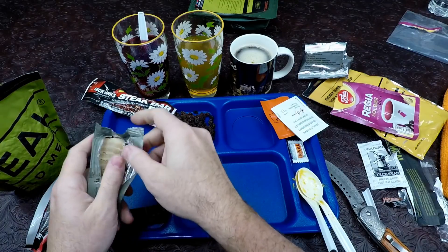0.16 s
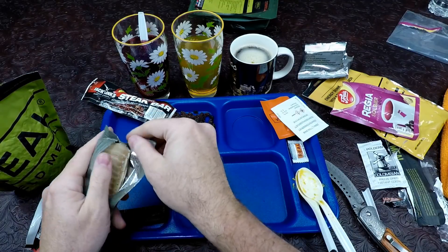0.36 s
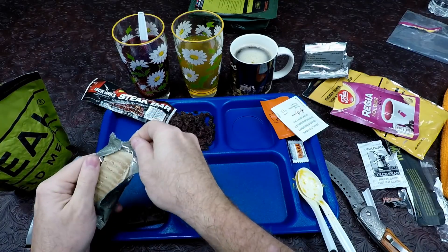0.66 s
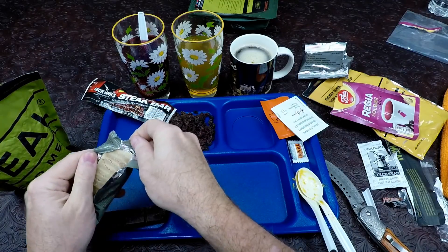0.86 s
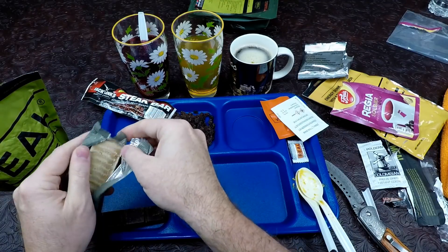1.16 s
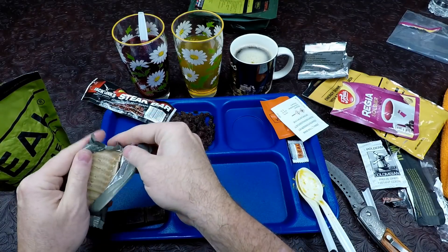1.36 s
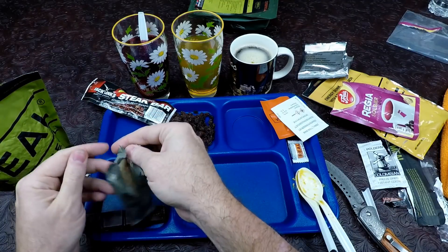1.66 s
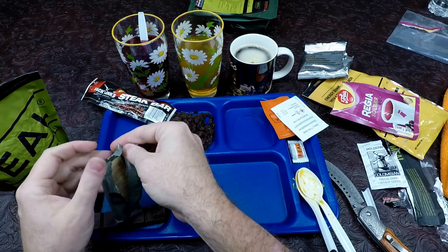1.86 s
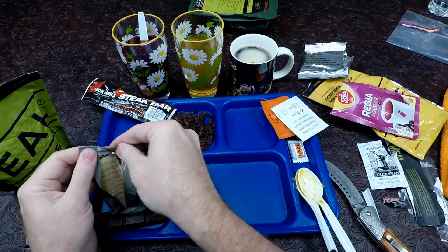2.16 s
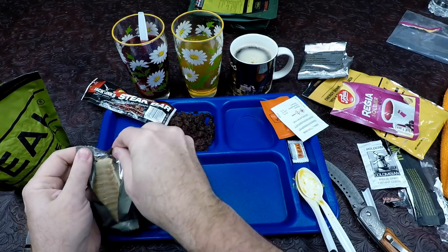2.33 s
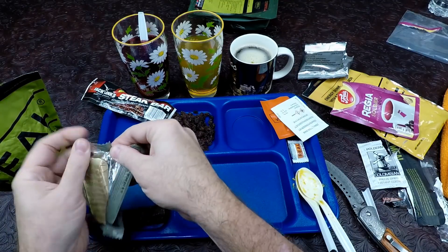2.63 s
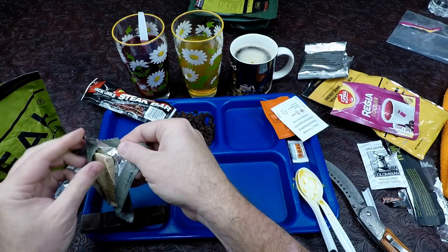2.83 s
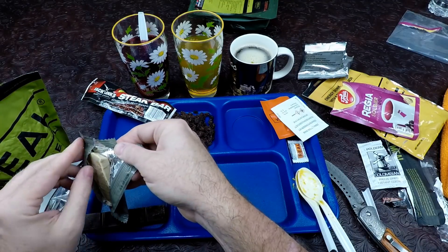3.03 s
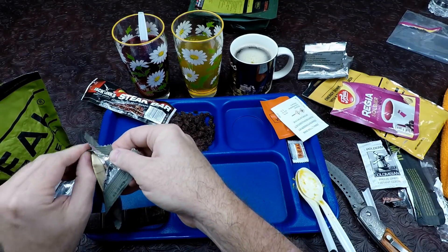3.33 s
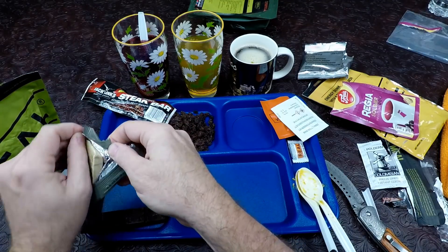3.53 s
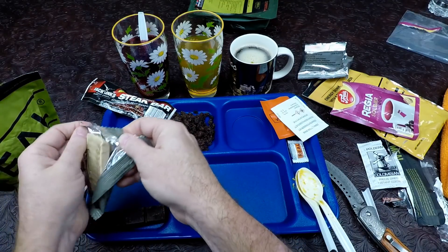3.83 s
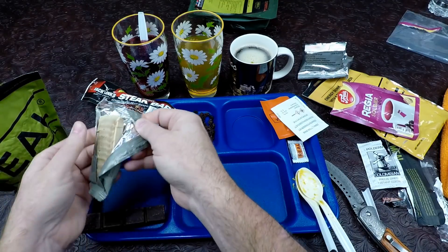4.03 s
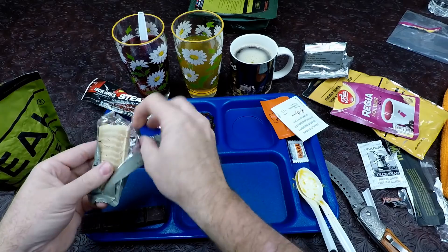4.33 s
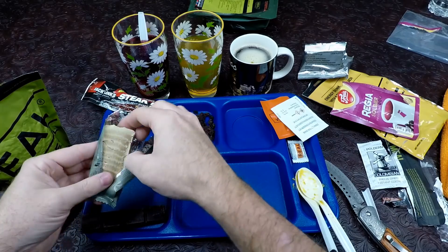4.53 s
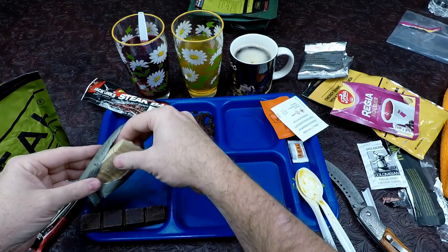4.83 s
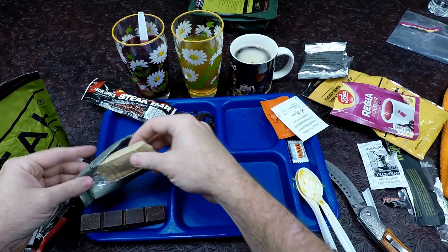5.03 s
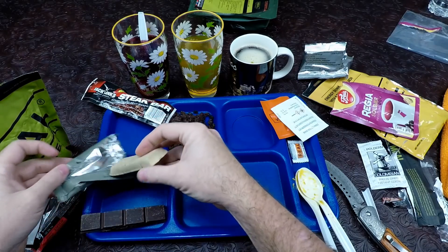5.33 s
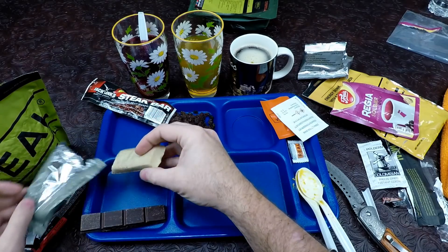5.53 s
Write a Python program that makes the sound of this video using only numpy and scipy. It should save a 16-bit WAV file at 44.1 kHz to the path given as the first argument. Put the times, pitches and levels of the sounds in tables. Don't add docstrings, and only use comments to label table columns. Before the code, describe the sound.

Close to the microphone, hands work a stiff foil-lined snack wrapper over a tray in a furnished room. From 0 to 0.95 s the seam is pulled: continuous fine crackle, bright ticks and clustered snaps, with small muffled thumps of trapped air. Around 1 s it eases, with scattered ticks, then stronger cracks arrive at 1.5-1.85 s as the foil tears. A short lull near 2.05 s leads to another sharp burst from 2.15 to 2.75 s, loudest around 2.3-2.5 s. From 2.9 to 3.45 s it is nearly still, with one soft pop near 3 s. Peeling brings crisp snaps from 3.5 to 4.15 s, then lighter settling ticks until 4.9 s. A brief crackle at 5.05-5.1 s and a fine rustle around 5.25 s accompany the snack sliding out, fading by the end. Short table reflections, a modest room tail, faint air and low appliance hum remain.

```python
import sys
import numpy as np
from scipy import signal
from scipy.fft import rfft, irfft, next_fast_len
from scipy.io import wavfile
from scipy.ndimage import uniform_filter1d

SR = 44100
rng = np.random.default_rng(int(sys.argv[2]) if len(sys.argv) > 2 else 0)


def dump(signal):
    limited = np.clip(np.atleast_2d(signal).T, -1, 1)
    pcm = np.round(limited * 32767).astype(np.int16)
    wavfile.write(sys.argv[1], SR, pcm)


def level_to_linear(level):
    exponent = np.asarray(level, float) / 20
    return 10 ** exponent


N = 250471
RING_WIDTH = 0.15


def unit(x):
    return x / np.sqrt(np.mean(x ** 2, axis=-1, keepdims=True) + 1e-20)


def along(points, hz):
    f, value = np.transpose(points)
    return np.interp(np.log(hz + 1), np.log(f + 1), value)


def coloured(x, points):
    n = x.shape[-1]
    m = 2 * next_fast_len(n)
    gain = level_to_linear(along(points, np.fft.rfftfreq(m, 1 / SR)))
    cepstrum = irfft(np.log(gain + 1e-6), m)
    cepstrum[1:m // 2] *= 2
    cepstrum[m // 2 + 1:] = 0
    return irfft(rfft(x, m) * np.exp(rfft(cepstrum)), m)[..., :n]


def resonant(x, hz, width_hz):
    m = 2 * x.shape[-1]
    f = np.fft.rfftfreq(m, 1 / SR)
    damping = 1j * f * width_hz
    return irfft(rfft(x, m) * damping / (hz * hz - f * f + damping), m)[..., :m // 2]


def placed(rows, s):
    at = np.round(s * SR).astype(int)[:, None] + np.arange(rows.shape[1])
    return np.bincount(at.ravel(), rows.ravel(), N + SR)[:N]


def bursts(count, size, t60, spread, lumpy_db, rise, jolt):
    t = np.arange(size) / SR
    life = t60 * np.exp(spread * rng.standard_normal((count, 1)))
    stutter = unit(uniform_filter1d(rng.standard_normal((count, size)), size=14))
    envelope = level_to_linear(-60 * t / life + lumpy_db * stutter) * (1 - np.exp(-(t / rise) ** 2))
    force = rng.standard_normal((count, size)) * envelope
    flip = rng.uniform(-1, 1, count)
    force[:, round(rise * SR)] += jolt * (flip + 0.14 * np.sign(flip))
    return force


def facet(force, hz, sharp, broad):
    hump = resonant(force, hz, broad * hz)
    ring = resonant(hump, hz, sharp * hz)
    return unit(unit(ring) + unit(hump))


# (frequency [Hz], level [dB per Hz])
AIR = [(15, -25), (25, -4.5), (64, -14.5), (123, -8), (363, -11.5), (451, -19), (659, -15.5), (1480, -21.5),
       (8360, -27), (14800, -36)]
# (frequency [Hz], level [dB rms], width [Hz]); the first is the wavering mains tone
HUM = [(120.2, -65.5, 1.4), (138, -76, 1.8), (171.8, -66.5, 16), (235, -69.5, 14.4), (368, -75, 3),
       (401.5, -77.5, 3)]


def background():
    f = np.fft.rfftfreq(N, 1 / SR)
    hum = 0
    for hz, db, width in HUM[1:]:
        line = rfft(rng.standard_normal(N)) / (1 + (2 * (f - hz) / width) ** 2)
        hum = hum + level_to_linear(db) * unit(irfft(line, N))
    hz, db, drift = HUM[0]
    wander = drift * np.cumsum(rng.standard_normal(N)) / SR ** 0.5
    mains = level_to_linear(db + 3.5) * np.sin(2 * np.pi * hz * np.arange(N) / SR + wander)
    rustle = unit(uniform_filter1d(rng.standard_normal(N), size=3000))
    air = level_to_linear(-61.5 + 1.94 * rustle) * unit(coloured(rng.standard_normal(N), AIR))
    return hum + mains + air


# (time [s], crackle level [dB])
HANDLING = [(0, -39), (.6, -39), (.95, -44), (1.38, -38.5), (1.47, -68), (1.65, -37), (1.9, -41),
            (2.11, -77), (2.17, -40.5), (2.6, -41.5), (2.9, -72), (3.44, -53.5), (4, -39), (4.2, -51.5),
            (4.45, -43), (4.95, -53.5), (5.25, -37), (5.68, -100)]
# (frequency [Hz], level [dB per Hz])
CRINKLE = [(300, -40.5), (500, -4.5), (680, 5.5), (1200, -3), (2000, 1.5), (2900, -1), (4400, -1),
           (8800, -1.5), (10300, -8), (15200, -14), (16500, -4)]


def crinkle(creases, count=2400):
    clumps = rng.uniform(0, N / SR, count // 4)
    s = np.repeat(clumps, 4) + 0.006 * rng.exponential(1, count)
    force = bursts(count=count, size=256, t60=0.0086, spread=0.32, lumpy_db=5.0, rise=0.0008, jolt=1.7)
    hz = np.clip(4800 * np.exp(0.82 * rng.standard_normal((count, 1))), 500, 15000)
    rows = 1.48 * unit(force) + facet(force, hz, sharp=0.3, broad=1.0)
    sizes = level_to_linear(np.minimum(3.2 * rng.exponential(1, (count, 1)), 12))
    crackle = unit(coloured(placed(sizes * rows, s), CRINKLE))
    effort_db = np.interp(np.arange(N) / SR, *np.transpose(HANDLING))

    set_off, set_off_s, calm_db = 0.38, 0.01, -63
    span = round(set_off_s * SR)
    power = np.roll(creases, span) ** 2
    nearby = np.abs(uniform_filter1d(uniform_filter1d(power, span), span))
    stirred = (1 + nearby / level_to_linear(calm_db) ** 2) ** (set_off / 2)
    return level_to_linear(effort_db - 16.0) * stirred * crackle


# (time [s], level [dB], facet pitch [Hz])
PRICKS = [(0.0092, -16, 3640), (0.0178, -19, 3270.0), (0.0343, -22, 3900), (0.0756, -16.5, 5800),
          (0.087, -29, 8790.0), (0.1199, -23, 3190.0), (0.1286, -21, 860.0), (0.1484, -18, 9040.0),
          (0.1693, -21, 2670.0), (0.2134, -22, 3880.0), (0.2382, -19, 3010.0), (0.2434, -24, 6800.0),
          (0.2798, -24, 3880.0), (0.2906, -26, 7060.0), (0.3246, -20, 885), (0.3637, -17, 2670.0),
          (0.4292, -36, 5830), (0.4712, -35, 3620.0), (0.4858, -15, 6290.0), (0.5048, -38, 860.0),
          (0.512, -30, 780.0), (0.5174, -31, 4390.0), (0.5436, -26.8, 2600), (0.6148, -19, 840),
          (0.6295, -18, 3240), (0.6567, -19, 8010.0), (0.6916, -18, 3620.0), (0.7263, -18, 4310.0),
          (0.73, -12.5, 3360.0), (0.7441, -20, 970), (0.7726, -19, 870), (0.816, -31, 2330.0),
          (0.8603, -21, 3500), (0.9003, -19, 8270.0), (0.9065, -13.5, 3440), (0.9421, -28, 2330.0),
          (1.0074, -34, 6120.0), (1.0396, -39, 1980.0), (1.0505, -41, 2240.0), (1.0703, -31.7, 2240.0),
          (1.1117, -26, 8000), (1.138, -27, 1900), (1.2134, -19.5, 5770.0), (1.2466, -25.3, 4390.0),
          (1.2636, -30, 1030.0), (1.2837, -31, 4570.0), (1.312, -30.2, 8180.0), (1.3407, -18, 5770.0),
          (1.3557, -18.5, 2000), (1.3654, -22, 5510.0), (1.4272, -28, 3620.0), (1.5158, -23, 4570.0),
          (1.5513, -19, 3360.0), (1.5617, -15, 4820.0), (1.589, -21, 9800),
          (1.6052, -17, 9500), (1.7098, -8, 7750.0), (1.7367, -16, 3620.0), (1.8017, -23.5, 4310.0),
       (1.818, -25, 6460.0), (1.8388, -14, 7410.0), (1.8999, -32, 3790.0), (1.96, -24, 3700.0),
       (1.97, -20, 6030.0), (1.9858, -29, 3170), (2.0316, -31, 4480.0), (2.0579, -27, 5000.0),
       (2.1378, -25, 5600.0), (2.1467, -15.5, 5600), (2.2016, -18, 2760.0), (2.217, -19, 1910),
       (2.251, -10, 5730), (2.2699, -26.5, 2500.0), (2.319, -6.5, 4500), (2.323, -5, 7840.0),
       (2.357, -25, 1980.0), (2.3742, -17, 2070.0), (2.3886, -13, 4310.0), (2.3505, -23, 2100),
       (2.41, -22, 4170), (2.428, -9.5, 3800), (2.447, -5.5, 3780), (2.4675, -21, 4390.0),
       (2.499, -18, 5430.0), (2.5428, -17, 1890.0), (2.5774, -24.5, 7580.0), (2.6404, -17, 3500),
       (2.6682, -22, 790), (2.6926, -26, 5770.0), (2.7034, -31.6, 3790.0), (2.7122, -22, 885),
       (2.751, -23, 4820.0), (2.756, -28, 3360.0), (2.7702, -34, 3530.0), (2.8218, -24, 5510.0),
       (2.8684, -28, 3270.0), (3.028, -26, 1800), (3.1586, -35, 3450.0), (3.2081, -34, 4740.0),
       (3.2901, -39.1, 7410.0), (3.325, -36, 1720.0), (3.4093, -35, 8270.0), (3.503, -27, 4030),
       (3.5323, -10, 5500), (3.5556, -29, 7410.0), (3.5957, -26, 8700.0), (3.6256, -9.2, 6400),
       (3.673, -30, 4220.0), (3.7068, -22.6, 3530.0), (3.7126, -21, 5000.0),
          (3.7254, -19, 5510.0), (3.777, -18, 1980.0), (3.8016, -8, 5000.0), (3.8337, -31, 2060),
        (3.8616, -7.5, 2220), (3.8829, -17, 8700.0), (3.8965, -29, 8180.0), (3.9842, -17.5, 2100),
        (4.0088, -30, 1810.0), (4.023, -28, 4390.0), (4.0493, -23, 5300), (4.085, -18, 3360.0),
        (4.0902, -7, 4430), (4.0974, -15, 4390.0), (4.217, -22, 4220.0), (4.2373, -20.5, 8650),
        (4.248, -25, 4570.0), (4.254, -29, 8700.0), (4.2729, -30, 8700.0), (4.2994, -30, 4310.0),
        (4.32, -26, 5170.0), (4.3563, -35, 2760.0), (4.3612, -21.5, 2240.0), (4.3665, -17.5, 8100.0),
        (4.3838, -13.5, 8100), (4.4213, -29, 5770.0), (4.429, -19, 1260), (4.4698, -21, 7300),
        (4.4875, -29.2, 4220.0), (4.554, -28, 2410.0), (4.5784, -31, 2240.0), (4.5846, -35, 950.0),
        (4.6074, -23.5, 4300), (4.6444, -47, 5250.0), (4.6874, -20.5, 4400), (4.7003, -28, 5860.0),
        (4.7222, -25, 4130.0), (4.777, -28, 8700.0), (4.8363, -18.5, 4000), (4.8623, -26, 1480),
        (4.8673, -23.5, 6160), (4.8818, -32, 2240.0), (4.8902, -34, 7750.0), (4.8958, -34, 7750.0),
        (5.0308, -25, 1980.0), (5.046, -33, 2760.0), (5.053, -27, 4570.0), (5.0762, -11.5, 5500),
        (5.0824, -16.5, 2450), (5.109, -27, 3880.0), (5.1815, -25.5, 3960.0), (5.1975, -37, 3530.0),
        (5.5169, -41, 6200.0), (5.5377, -43, 1030.0), (5.6121, -40, 600.0)]
# (frequency [Hz], level [dB per Hz])
CRACK = [(250, -8), (1000, -4), (2000, 7.5), (3000, 5.5), (4400, 8), (6000, 7.5), (8600, 12), (10300, 2),
         (13500, -1.5), (15200, -3.5), (16500, -26)]


def pricks():
    s, db, hz = np.transpose(PRICKS)[:, :, None]
    force = bursts(count=len(s), size=440, t60=0.0068, spread=0.51, lumpy_db=3.0, rise=0.0009, jolt=1.27)
    prick = unit(resonant(coloured(force, CRACK), hz, 2 * hz))
    ring = facet(force, hz, sharp=RING_WIDTH, broad=1.0)
    rows = 0.79 * (hz / 4000) ** 0.12 * prick + ring
    return placed(level_to_linear(db - 26.5) * unit(rows), s[:, 0] - 0.0003)


# (time [s], level [dB], facet pitch [Hz])
TICKS = [(0.055, -25, 8460), (0.08, -26.5, 3140), (0.113, -27, 3280), (0.162, -23, 8500), (0.225, -22, 7860),
         (0.346, -20, 3370), (0.385, -22, 4050), (0.439, -26.5, 1370), (0.528, -26.5, 8900),
         (0.56, -21.5, 3300), (0.641, -20, 8450), (0.771, -29, 920), (0.846, -25, 2730), (0.882, -22, 1540),
         (0.891, -23, 3830), (1.21, -25.5, 4620), (1.227, -30.5, 2000), (1.258, -27, 5230),
         (1.35, -22, 4640), (1.45, -29.5, 6030), (1.559, -38, 1410), (1.596, -23.5, 4580),
         (1.633, -14, 8560), (1.7, -15.5, 3530), (1.839, -24, 7430), (1.846, -22, 4300),
         (1.964, -27.5, 4050), (1.985, -44, 2880), (2.043, -39, 750), (2.073, -37.5, 7950),
         (2.188, -25, 1850), (2.216, -22.5, 1980), (2.234, -19.5, 5700), (2.327, -23, 4300),
        (2.384, -24, 4000), (2.472, -21.5, 3270), (2.607, -20, 3670), (2.633, -18.5, 4640),
        (2.72, -25, 2270), (2.745, -27.5, 3640), (2.777, -28, 2630), (2.812, -24, 5570),
        (2.874, -28.5, 3100), (3.028, -43, 929), (3.135, -38.5, 760), (3.221, -27.5, 5460),
        (3.348, -27, 5130), (3.388, -36, 4540), (3.47, -27.5, 5480), (3.477, -30, 3340), (3.518, -29, 6350),
        (3.55, -28, 5400), (3.594, -20.5, 4040), (3.609, -30, 6370), (3.666, -35, 3320), (3.717, -24, 1970),
        (3.733, -29, 2280), (3.798, -25, 6600), (3.917, -25, 2100), (3.976, -25, 1980),
         (4.022, -26, 5110), (4.045, -19.5, 4430), (4.056, -29, 5340), (4.08, -24, 4430),
          (4.109, -18, 5210), (4.196, -28.5, 4260), (4.21, -28, 8370), (4.216, -34, 4240),
          (4.237, -29, 3520), (4.246, -30, 4430), (4.26, -26.5, 8100), (4.287, -24, 2320),
          (4.324, -24, 5030), (4.334, -27, 1250), (4.347, -23.5, 8600), (4.366, -37, 8000),
          (4.441, -24, 8200), (4.39, -22, 3320), (4.451, -24.5, 780), (4.493, -30.5, 1520),
          (4.529, -27.5, 1160), (4.607, -48, 4480), (4.687, -37, 4630), (4.722, -28.5, 3700),
          (4.736, -37, 1550), (4.785, -28, 7780), (4.837, -36, 705), (4.909, -35, 5200),
         (5.024, -31, 5140), (5.083, -37, 2440), (5.088, -29, 2620), (5.142, -30, 3980),
         (5.238, -24.5, 7440), (5.258, -27.5, 3280), (5.264, -23.5, 3290), (5.268, -40, 3220),
         (5.443, -39.5, 3180), (5.462, -38.5, 5500), (5.493, -36.5, 1700), (5.55, -39, 2620),
         (5.628, -43, 2660)]


def ticks():
    s, db, hz = np.transpose(TICKS)[:, :, None]
    force = bursts(count=len(s), size=440, t60=0.013, spread=0.38, lumpy_db=2.0, rise=0.001191, jolt=2.2)
    crack = unit(resonant(coloured(force, CRINKLE), hz, 3.6 * hz))
    ring = facet(force, hz, sharp=RING_WIDTH, broad=0.23)
    rows = 1.4 * (hz / 4000) ** 0.053 * crack + ring
    return placed(level_to_linear(db - 19.5) * unit(rows), s[:, 0] - 0.0001)


# (time [s], level [dB], pitch [Hz])
THUMPS = [(0.139, -39.5, 1170), (0.313, -37, 1160), (0.323, -39.5, 755), (0.504, -38, 780),
          (0.58, -33.5, 1040), (0.597, -31.5, 730), (0.613, -48, 850), (0.742, -39, 936), (0.771, -42, 905),
          (0.906, -39.5, 755), (1.145, -40.5, 650), (1.487, -41, 1040), (1.614, -39, 604),
          (1.66, -40.5, 470), (1.653, -28, 747), (1.804, -38.5, 635), (2.427, -35, 750),
          (2.445, -37.5, 870), (2.487, -42, 880), (2.515, -32.5, 1080), (2.619, -41.5, 670),
          (3.012, -32, 880), (3.688, -45, 780), (3.821, -38, 840), (3.862, -40, 900), (3.938, -35, 770),
          (4.049, -40, 656), (4.089, -40, 710), (4.452, -58, 754), (4.847, -38.5, 730)]


def thumps():
    s, db, hz = np.transpose(THUMPS)[:, :, None]
    t = np.arange(880) / SR
    push = np.sin(2 * np.pi * hz * t) * level_to_linear(-60 * t / 0.013) * (1 - np.exp(-t / 0.0025))
    force = bursts(count=len(s), size=880, t60=0.0077, spread=1.0, lumpy_db=5.5, rise=0.0011, jolt=1.46)
    flutter = resonant(resonant(force, hz, 0.48 * hz), hz, 0.9 * hz)
    rows = unit(push) + 0.98 * unit(flutter)
    return placed(level_to_linear(db - 10.0) * unit(rows), s[:, 0])


# (time [s], facet ring level [dB], facet pitch [Hz],
# crack level [dB])
SNAPS = [(0.1408, -27, 4120, -30), (0.229, -32.5, 2960, -34), (0.265, -31, 2450, -34),
         (0.2723, -24, 3180, -45), (0.2789, -28, 3870, -47), (0.313, -23.5, 3200, -32),
         (0.3614, -32, 2780, -31.5), (0.394, -20.5, 4300, -32), (0.401, -27, 4970, -28),
         (0.418, -25.5, 3370, -55), (0.478, -30, 4890, -34), (0.573, -25, 3350, -33),
         (0.581, -22, 3400, -32), (0.5892, -22, 3940, -26), (0.598, -21, 3970, -32),
         (0.6744, -46, 3460, -24), (0.7053, -36, 2570, -20.5), (0.7134, -32, 4210, -27.5),
         (0.7349, -19, 4500, -27.5), (0.749, -33, 3290, -35), (0.761, -32, 4740, -30),
         (0.9063, -24, 3260, -39), (0.911, -38, 3910, -34), (0.9228, -51, 4730, -28.5),
         (1.1115, -33, 5200, -35), (1.1433, -26, 4050, -31.5), (1.289, -50, 4700, -33),
         (1.3172, -38, 4970, -31.5), (1.3732, -24, 4660, -39), (1.4111, -36, 2200, -30.5),
         (1.487, -23, 4600, -25), (1.496, -21.5, 4760, -18.5), (1.57, -23, 1470, -28),
        (1.6132, -30, 4400, -26), (1.6208, -31, 4440, -24), (1.6256, -39, 2180, -23),
        (1.6352, -35, 2780, -27), (1.6561, -15.5, 4410, -22.5), (1.6937, -39, 4330, -25),
        (1.714, -31, 3500, -35), (1.725, -21, 3550, -20.5), (1.7467, -18, 5100, -27),
        (1.8057, -15.5, 4400, -22), (1.824, -36, 3240, -29), (2.1465, -23, 3530, -38),
        (2.1598, -30, 3330, -27.5), (2.252, -40, 2820, -33), (2.3204, -20.5, 3730, -32),
        (2.325, -43, 4420, -36), (2.429, -27, 3730, -43), (2.4426, -19.5, 3700, -35),
        (2.488, -27.5, 1570, -28.5), (2.5112, -14, 1980, -30), (2.5168, -43, 1420, -18.5),
        (2.561, -21, 1470, -54), (2.592, -24, 2020, -31.5), (2.6731, -23.5, 2450, -29),
        (2.7156, -20, 3680, -58), (2.938, -29.5, 4000, -23.5), (3.0132, -27.5, 3280, -61),
         (3.484, -31.5, 3400, -33), (3.5102, -23.5, 4400, -24), (3.533, -25.5, 1850, -39),
        (3.578, -27, 3640, -28.5), (3.6179, -38, 3360, -24), (3.6259, -23, 3820, -39),
        (3.6784, -26, 3470, -24.5), (3.6893, -19.5, 3660, -35), (3.7456, -30.5, 2290, -31),
        (3.7862, -16.5, 3970, -51), (3.8053, -26, 4600, -27.5), (3.811, -27, 2240, -24),
        (3.8208, -41, 2390, -27.5), (3.833, -19, 2050, -28), (3.8626, -28, 2400, -28),
        (3.905, -24, 2080, -27.5), (3.94, -18, 4370, -28), (3.9526, -20.5, 2020, -26.5),
        (4.049, -30, 5140, -42), (4.09, -28, 4670, -27), (4.097, -34, 4780, -50),
        (4.1197, -36, 4400, -23.5), (4.1368, -24, 5140, -29), (4.4003, -26, 3350, -34.5),
        (4.415, -38, 3280, -28.5), (4.5103, -38, 3770, -30), (4.849, -34, 1330, -32),
        (5.0771, -26, 4570, -47), (5.117, -24, 3020, -36), (5.226, -24, 3480, -58)]


def snaps():
    s, ring_db, hz, crack_db = np.transpose(SNAPS)[:, :, None]
    force = bursts(count=len(s), size=880, t60=0.011, spread=0.28, lumpy_db=6.0, rise=0.0019, jolt=1.63)
    crack = level_to_linear(crack_db - 13.5) * unit(coloured(force, CRACK))
    ring = level_to_linear(ring_db - 19.5) * facet(force, hz, sharp=RING_WIDTH, broad=0.63)
    return placed(crack + ring, s[:, 0] - 0.0013)


def table(x):
    echoes = [(0.0012, -26.5), (0.0052, -20.5), (0.016, -21)]  # (delay [s], level [dB])
    return sum(level_to_linear(db) * np.pad(x, (round(s * SR), 0))[:N] for s, db in echoes)


# (frequency [Hz], t60 [s])
ROOM = [(350, 0.43), (1500, 0.4), (5000, 0.47), (12000, 0.25)]
# (frequency [Hz], level [dB])
WALLS = [(300, -62), (500, -9.5), (800, -4.5), (2000, -12.5), (6000, -10.5), (12000, -11)]


def room(x):
    hz, t, z = signal.stft(x, SR, nperseg=256)
    power = uniform_filter1d(np.abs(z) ** 2, size=7, axis=0)
    power[:, 0] += 40 * power.mean(axis=1)
    fading = level_to_linear(-120 * (t[:250] - t[0]) / along(ROOM, hz)[:, None])
    fading[:, :1] = 0
    fading = fading / fading.sum(axis=1, keepdims=True)
    tail = signal.fftconvolve(power, fading, axes=1)[:, :len(t)]
    noise = signal.stft(rng.standard_normal(N), SR, nperseg=256)[2]
    noise = noise / np.abs(noise).mean()
    patches = uniform_filter1d(rng.standard_normal(z.shape), size=9, axis=0)
    patches = uniform_filter1d(patches, size=9)
    level = level_to_linear(2.54 * patches / patches.std()) * np.sqrt(np.abs(tail))
    returned = level * noise * level_to_linear(along(WALLS, hz))[:, None]
    return signal.istft(returned, SR, nperseg=256)[1][:N]


def scene():
    creases = snaps() + ticks() + pricks()
    foil = creases + crinkle(creases)
    pocket = thumps()
    direct = foil + pocket
    return (direct + table(direct) + room(foil + 0.8 * pocket) + background())[None]


def band_limit(x):
    return signal.sosfilt(signal.butter(12, 16480, fs=SR, output="sos"), x)


def record(dry):
    mix = dry / (1 + np.abs(dry / 0.21) ** 4) ** (1 / 4)
    return band_limit(mix)


dry = scene()
out = record(dry)
dump(out)
```